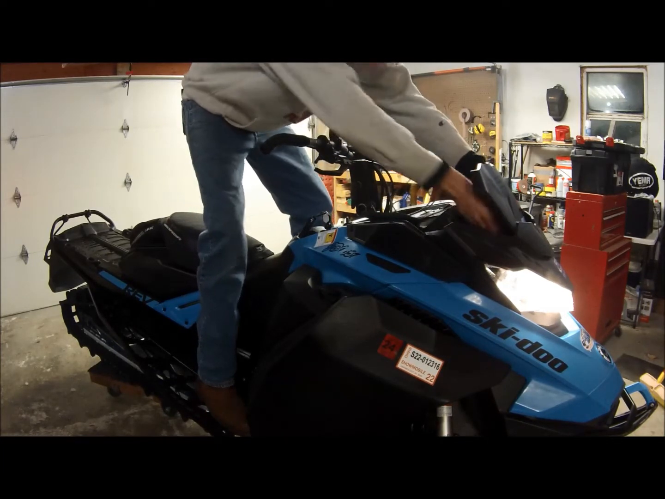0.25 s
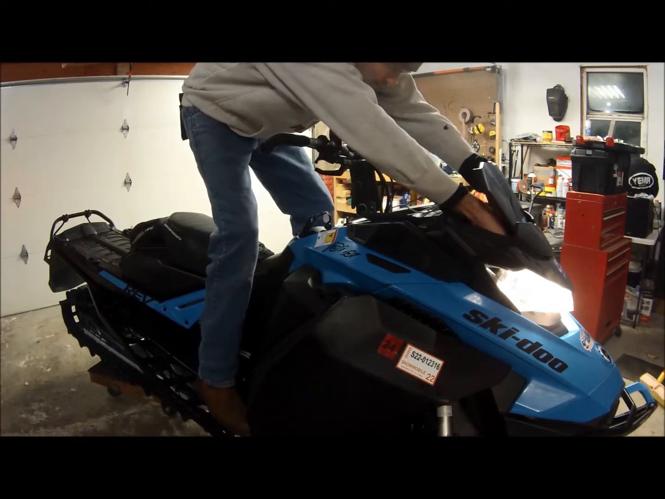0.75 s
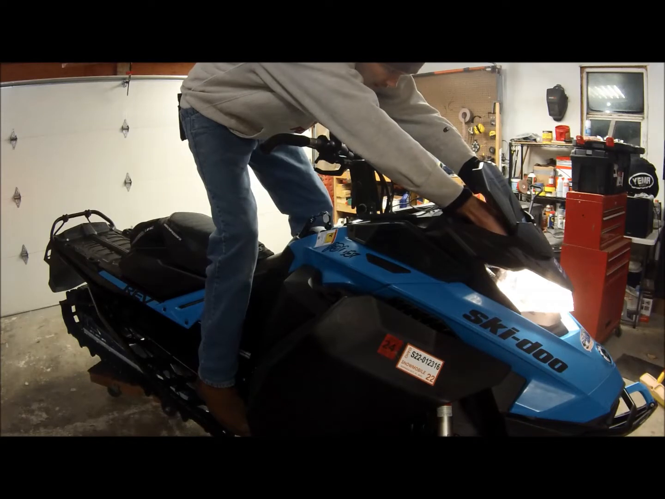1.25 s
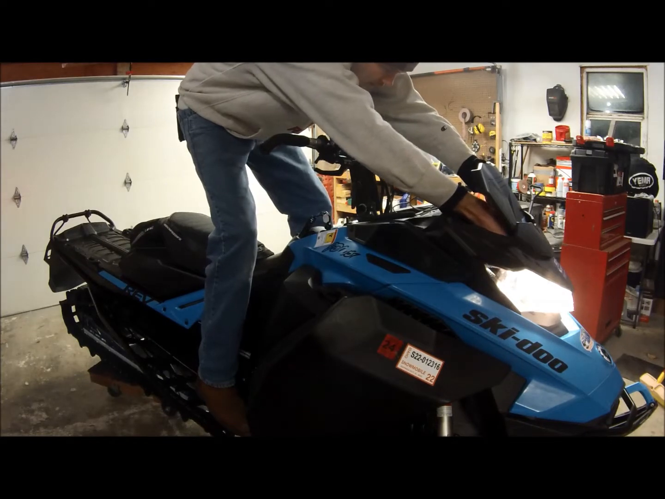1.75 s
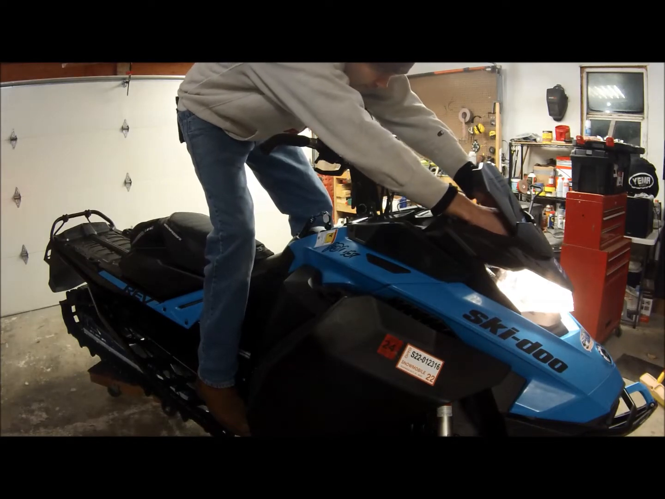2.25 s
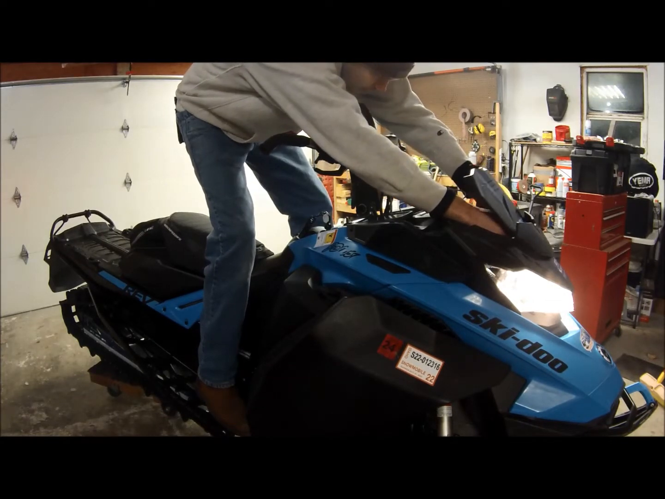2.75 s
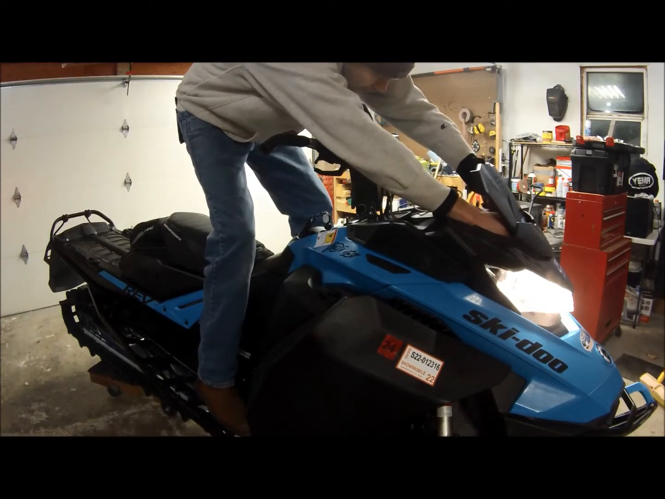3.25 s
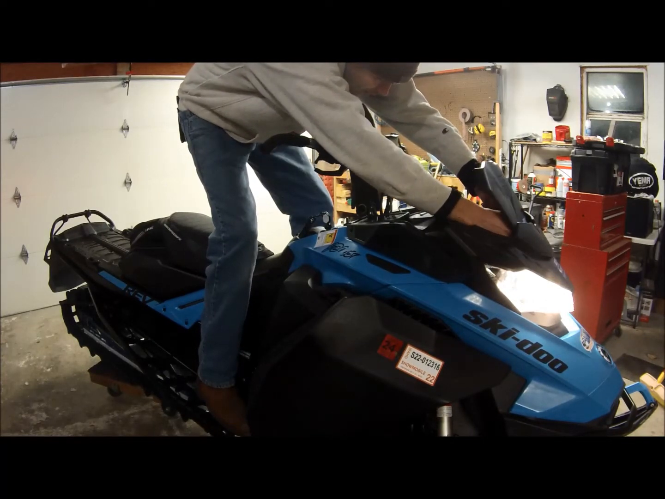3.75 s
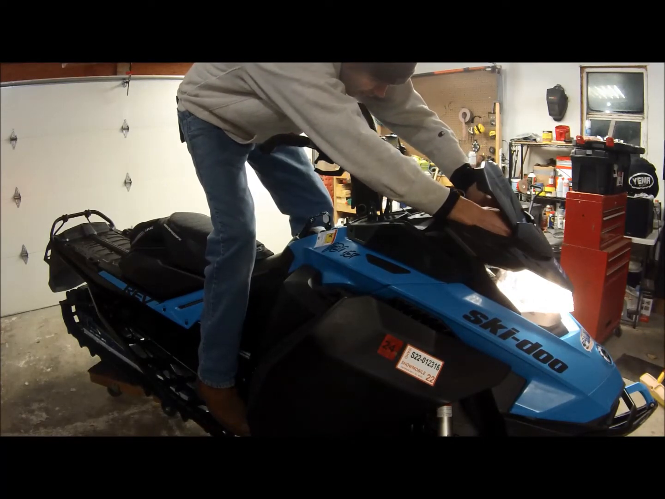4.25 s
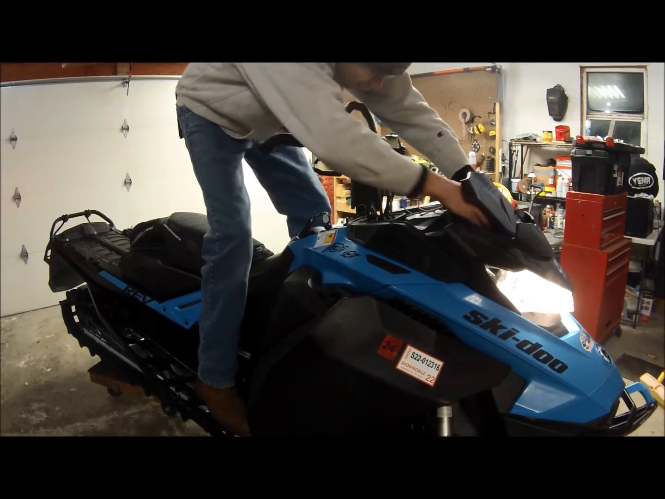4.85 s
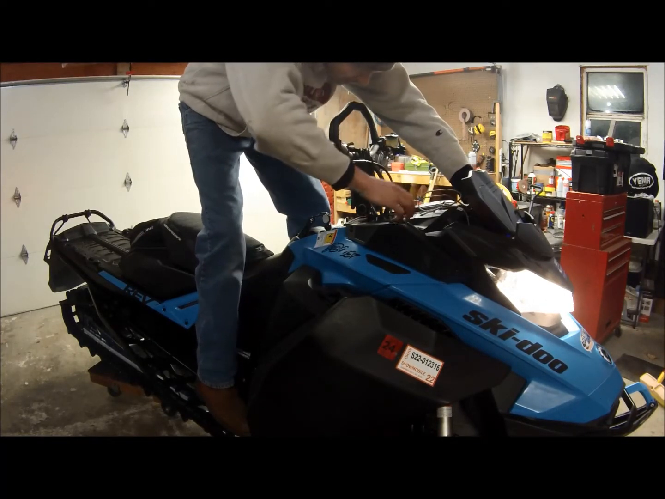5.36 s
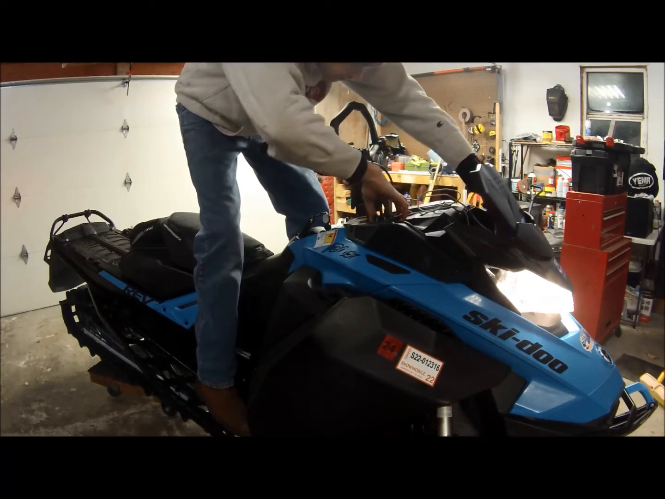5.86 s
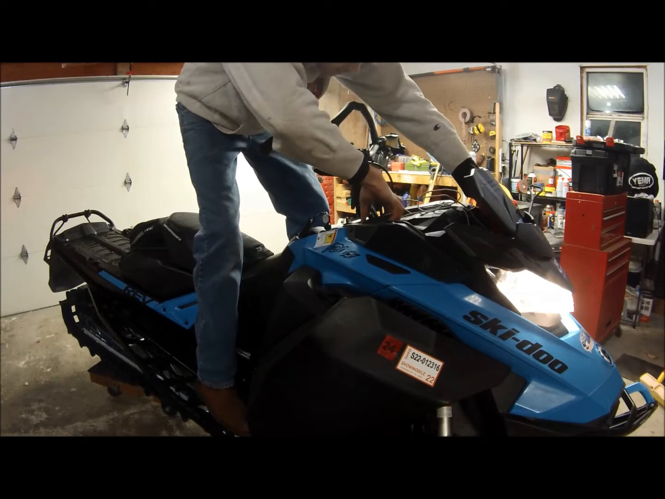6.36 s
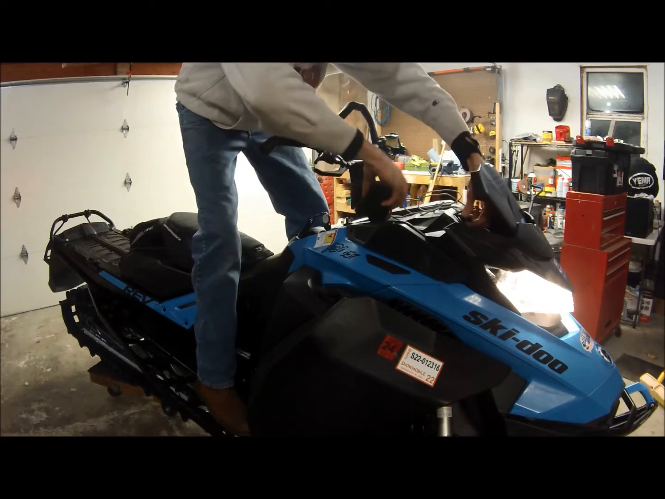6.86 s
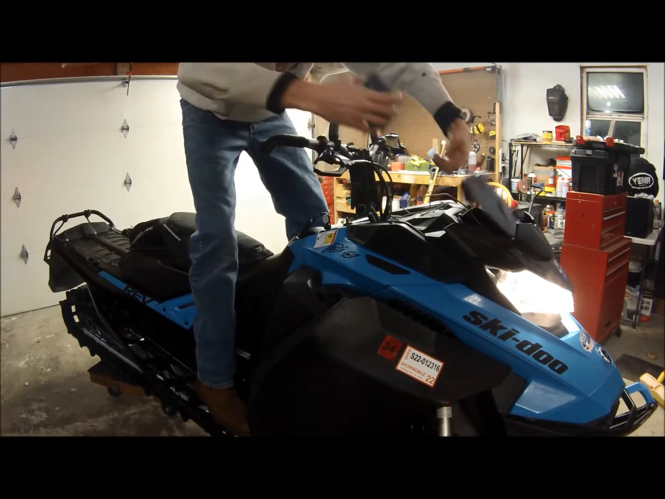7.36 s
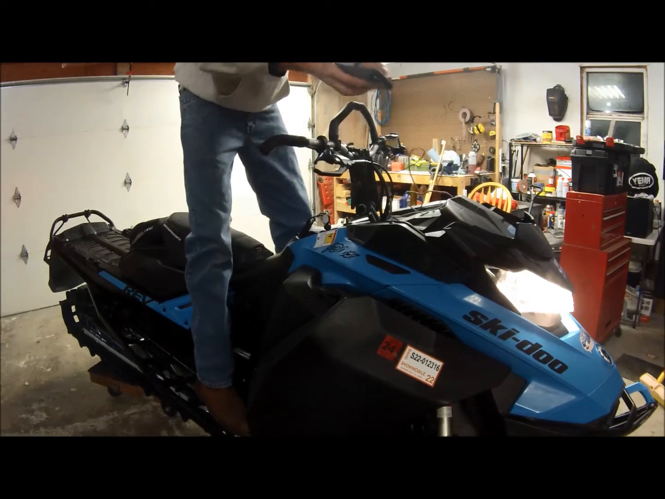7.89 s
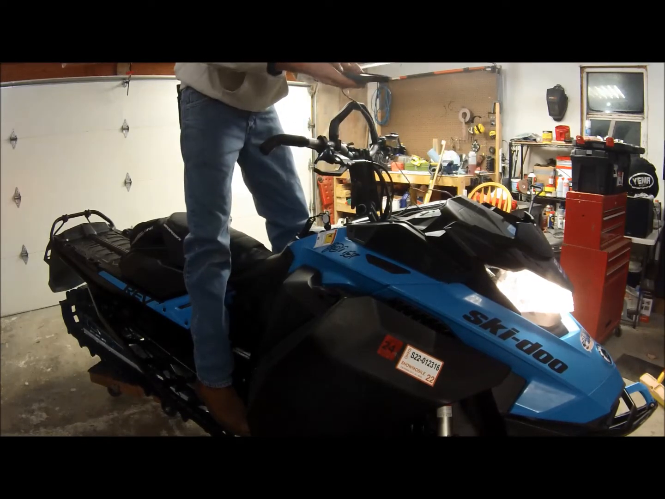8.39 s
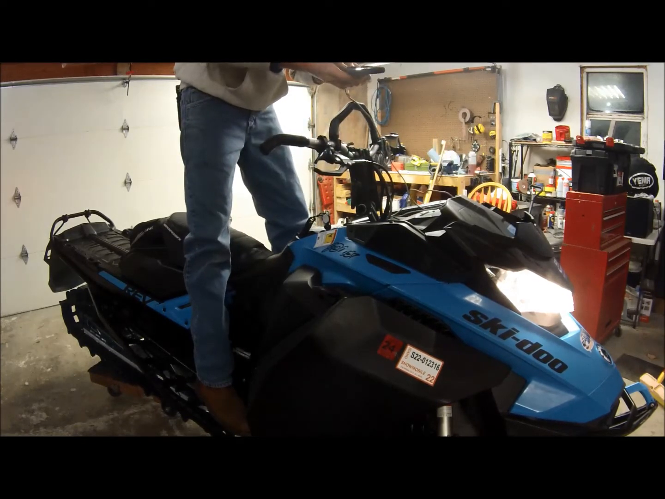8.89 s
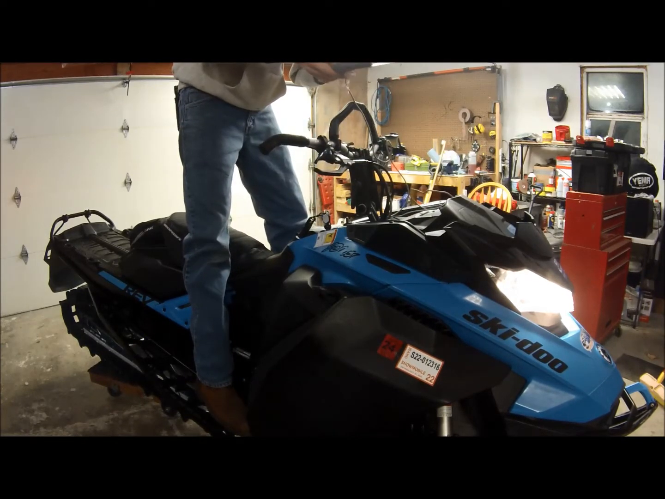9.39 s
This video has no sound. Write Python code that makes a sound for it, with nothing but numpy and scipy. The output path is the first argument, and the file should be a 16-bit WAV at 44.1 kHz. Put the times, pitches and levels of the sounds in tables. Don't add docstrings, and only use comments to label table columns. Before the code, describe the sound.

Continuous low engine idle, buzzing and slightly lumpy, never revving up or stopping. Over the boom lie a throaty exhaust burble and dry rattling of pistons and clutch, softened by diffuse garage echo. Tiny ticks are almost buried in it; one clear, bright plastic snap with quick little bounces stands out late. The small microphone a few metres away gives muffled treble.

```python
import sys
import numpy as np
from scipy import signal
from scipy.fft import rfft, irfft
from scipy.io import wavfile
from scipy.ndimage import uniform_filter1d

SR = 44100
rng = np.random.default_rng(int(sys.argv[2]) if len(sys.argv) > 2 else 0)


def to_wav(s):
    ch = np.atleast_2d(s).T
    pcm = np.round(np.clip(ch, -1, 1) * 32767)
    wavfile.write(sys.argv[1], SR, pcm.astype(np.int16))


def magnitude_from_level(level_db):
    exponent = np.asarray(level_db, float) / 20
    return 10 ** exponent


N = 424683


def level(x, db):
    return x * magnitude_from_level(db) / np.sqrt(np.mean(x ** 2))


def curves(table):
    s, *columns = np.transpose(table)
    return [np.interp(np.arange(N) / SR, s, c) for c in columns]


def spells(events, half_s, late_s=0):
    t = np.arange(0, N, 64) / SR
    s, *heights = np.transpose(events)
    bells = np.exp(-0.5 * ((t - s[:, None] - late_s) / half_s) ** 2)
    return [np.interp(np.arange(N) / SR, t, h @ bells) for h in heights]


def walk(rate):
    k = int(SR / rate)
    held = np.repeat(rng.standard_normal(N // k + 1), k)
    return 1.3 * uniform_filter1d(uniform_filter1d(held, k), k)[:N]


def ring(x, modes, sign=-1):
    out = 0
    for k, (hz, width, db) in enumerate(modes):
        b, a = signal.iirpeak(hz, hz / (1.74 * width), fs=SR)
        mode = signal.lfilter(b, a, signal.lfilter(b, a, x))
        out = out + sign ** k * magnitude_from_level(db) * mode
    return out


def colour(x, spectrum):
    hz, db = np.transpose(spectrum)
    f = np.maximum(np.arange(N // 2 + 1) * SR / N, 1)
    return irfft(rfft(x) * magnitude_from_level(np.interp(np.log(f), np.log(hz), db)), N)


def even(x, floor):
    power = uniform_filter1d(x ** 2, size=5000)
    return level(x / np.sqrt(power + floor * np.mean(x ** 2)), 0)


def pulses(turns, size, late_s):
    at = np.flatnonzero(np.diff(np.floor(turns)))
    delay = (late_s[:len(at)] * SR).astype(int)
    out = np.zeros(N)
    out[np.clip(at + delay, 0, N - 1)] = size[:len(at)]
    return out


def governor():
    # time in seconds, firing rate in Hz, lumpiness of the firings in dB.
    idle = [(0.0, 51.76, 1), (0.44, 47.2, 1), (0.65, 50.85, -3), (0.8, 48.36, -4.5), (1.46, 50.82, 4),
            (1.6, 47.68, 0), (2.42, 50.77, -1.5), (3.04, 48.4, 0.5), (3.55, 50.17, -5), (3.71, 46.2, -1.5),
            (4.45, 50.4, 0.9), (5.08, 48.74, -1), (5.93, 51.68, 5), (6.55, 49.2, 3.5), (7.4, 48.1, -0.5),
            (8.39, 50.6, 1.5), (8.62, 48.3, -3), (9.23, 50.5, -0.4)]
    # time in seconds, loss of beat in dB, speed lost afterwards in Hz.
    stumbles = [(0.13, 2.7, -0.17), (0.36, 1, -0.25), (0.65, 2, 0.8), (1.3, 1, 0.47), (1.6, 2.0, -1.04),
                (2.43, 4, -0.32), (2.62, 0, 0.88), (2.9, 4.3, 2.5), (3.22, 3, 0.26), (3.92, 2, 0.45),
                (4.24, 5, -0.0), (4.57, 1, -0.13), (4.87, 3, -0.48), (5.07, 1, 1.41), (5.43, 4.5, 1.0),
                (5.71, 5, 2), (6.06, 5.0, 1.3), (6.37, 2.5, 0.1), (6.82, 5.4, 0.54), (7.16, 3.9, 1.02),
                (7.62, 2.3, 0.36), (8.03, 1.8, 0), (8.37, 1, -0.0), (8.56, 2.2, 0.17), (9.26, 4, -0.4),
                (9.4, 4, 1.1)]
    # time
    # in seconds, flare in dB.
    catches = [(0.79, 2.5), (1.15, 1.2), (1.54, 2.5), (1.92, 0.5), (2.09, 1.8), (2.33, 1.6), (2.5, 1),
               (2.7, 1.8), (2.92, 3.8), (3.27, 1.5), (3.63, 2.5), (4.14, 0.5), (4.45, 1.5), (4.74, 2),
               (5.08, 1), (5.36, 0.5), (5.76, 2), (6.53, 2.5), (6.87, 4), (7.2, 0.8), (7.5, 4), (7.91, 0.8),
               (8.29, 1.4), (8.6, 0.5), (8.92, 1), (9.11, 1.4)]
    # time in seconds, thump lost in dB.
    even_runs = [(0.29, 3), (0.76, 2), (1.42, 6), (1.86, 6), (3.1, 6), (3.4, 2), (3.6, 9.7), (3.98, 7),
                 (4.95, 4.1), (5.55, 3), (6.9, 6), (7.8, 5.5), (8.69, 7), (9.19, 10)]
    # time in seconds, muffler in dB, pipe in dB.
    puffs = [(0.15, 3.7, 3), (0.37, 0, 3.0), (1.16, 3, 2.1), (1.38, 1, 3), (2.35, 1, 2), (2.67, 3, 0.5),
             (2.96, 2, 2.7), (3.25, 3, 0.5), (3.64, 2.5, 2), (4.42, 0, 3), (4.65, 1, 1.5), (5.34, -2, 2.5),
             (5.68, -2, 2.5), (5.95, 1, 1.5), (6.09, 1, 1), (6.33, 1, 2.5), (6.9, 1, 3), (7.49, 6, 1.8),
             (8.13, 2.8, -1.5), (8.41, 2.5, 0.8), (8.8, 2.5, 0), (8.96, 1, 0.5), (9.22, 3, 4.5),
             (9.4, 1, 2.0)]
    slow_hz, lumpy = curves(idle)
    fast = slow_hz - 49.3
    stumble = spells(stumbles, half_s=0.021)[0]
    sag_hz = spells(stumbles, half_s=0.07, late_s=0.07)[1]
    catch = spells(catches, half_s=0.029)[0]
    calm = spells(even_runs, half_s=0.051)[0]
    muffler, pipe = spells(puffs, half_s=0.033)

    boom_db = -21.5 - 0.2 * fast - 1.27 * stumble - 0.15 * lumpy
    thump_db = -33.5 + 0.52 * lumpy + stumble - 1.6 * calm
    warming_db = 0.28 * np.arange(N) / SR
    muffler_db = -35.5 + 0.75 * fast + 1.33 * muffler + warming_db
    pipe_db = -31.5 + 0.2 * fast + 1.34 * pipe
    clatter_db = -35 + 0.82 * catch
    return slow_hz - sag_hz, boom_db, (thump_db, muffler_db, pipe_db), clatter_db


def boom(turns, boom_db):
    # multiple of the firing rate, level under the fundamental in dB.
    harmonics = [(1 / 2, -38), (2.3, -40), (3, -12), (4, -30)]
    angle = 2 * np.pi * turns + 0.078 * walk(16)
    wave = magnitude_from_level(0.7 * walk(11)) * np.sin(angle)
    for k, db in harmonics:
        wave = wave + magnitude_from_level(db + 1.4 * walk(12)) * np.sin(k * angle + 0.088 * k * walk(12))
    return np.sqrt(2) * magnitude_from_level(boom_db) * wave


def exhaust(turns, thump_db, muffler_db, pipe_db):
    # frequency in Hz, width in Hz, level in dB.
    thump_bands = [(65.2, 5, 2), (84.2, 6.3, 0.5), (119.2, 16, -2.5), (134.2, 10.4, -7.5), (173, 12.7, -7)]
    # frequency in Hz, width in Hz, level in dB.
    muffler_modes = [(170.3, 11.5, -3), (194.8, 9.2, -9.5), (253, 21.8, -1), (285.2, 19.8, -3),
                     (316.4, 15, -19.5)]
    # frequency in Hz, width in Hz, level in dB.
    pipe_modes = [(334.9, 16, -4), (363.3, 12.9, 3), (397.9, 12.8, -3.5), (430.6, 14, -9.5),
                  (461.6, 8.7, -10.5)]
    chance = rng.standard_normal((600, 3)).T
    third = 2 * np.pi / 3
    charge = np.cos(np.cumsum(third + 0.45 * chance[0])) + 0.18 * chance[1]
    thump = even(ring(pulses(turns, charge, 0 * charge), thump_bands), 0.24)

    settling_db = 0.6 * (np.arange(N) - N / 2) / SR
    uneven = magnitude_from_level(0.6 * (thump_db - np.mean(thump_db)) - settling_db)
    late_s = 0.00028 * chance[2]
    regular = pulses(turns, np.ones_like(charge), late_s)
    blow = regular + 0.31 * uneven * pulses(turns, charge, late_s)
    hiss = level(rng.standard_normal(N), -7)
    gas = level(blow, 0) + uneven * hiss
    muffler = even(ring(gas, muffler_modes), 0.34)
    pipe = even(ring(np.roll(gas, shift=SR // 120), pipe_modes), 0.32)
    return magnitude_from_level(thump_db) * thump + magnitude_from_level(muffler_db - 0.16) * muffler - magnitude_from_level(pipe_db + 0.07) * pipe


def clatter(turns, db):
    # frequency in Hz, width in Hz, level in dB.
    hood = [(681, 9, -7.5), (1102, 69, -18.5), (1290, 32, -17), (1473, 15, -11), (1615, 15, -15),
            (1716, 14.3, -3), (1760, 40, -16), (1834, 50, -4), (2050, 49, -19)]
    # frequency in Hz, level in dB per Hz.
    knock_spectrum = [(300, -49), (480, 1), (560, 1), (700, 0), (850, -1), (960, 2.5), (1180, 0.5),
                      (1400, -7), (1760, -2.5), (2010, -6.5), (2600, -9), (3700, -10), (15500, -13)]
    knocks = (rng.random(N) < 1500 / SR) * rng.standard_normal(N)
    beat = 1 + 0.15 * np.cos(2 * np.pi * turns - 1.2) + 0.087 * np.cos(4 * np.pi * turns)
    smear = rng.standard_normal(N)
    drive = (beat * level(knocks, -6.5) + smear) * magnitude_from_level(0.88 * walk(20))
    shaped = colour(drive + magnitude_from_level(9.5) * ring(drive, hood, sign=0.83), knock_spectrum)
    return level(shaped, 2.71) * magnitude_from_level(db)


def rumble():
    # frequency in Hz, level in dB per Hz.
    rumble_spectrum = [(12, -34), (24, -6), (34, -20), (60, -10.5), (100, -11), (215, -13.5), (330, -11),
                       (520, -20.5), (700, -44)]
    return level(colour(rng.standard_normal(N), rumble_spectrum), -34.5)


def snaps():
    # time in seconds, peak level in dB.
    snap_events = [
        (1.1812, -48),
        (3.4224, -52),
        (7.4697, -26.5),
        (7.492, -44),
        (7.507, -46),
        (9.2106, -59),
    ]
    # frequency in Hz, width in Hz, level in dB.
    snap_modes = [(2010, 1900, 1), (3380, 1130, 9), (6150, 1100, 14.6), (8540, 2200, 16), (11200, 2100, 17),
                  (13900, 2200, 27)]
    out = np.zeros(N)
    t = np.arange(int(0.03 * SR)) / SR
    crack = (1 - np.exp(-t / 0.00048)) * np.exp(-t / 0.0023)
    rebound = 0.15 * (t > 0.006) * np.exp(-np.abs(t - 0.006) / 0.0015)
    for s, db in snap_events:
        signs = np.sign(rng.standard_normal(len(t)))
        out[int(s * SR):int(s * SR) + len(t)] += magnitude_from_level(db) * (crack + rebound) * signs
    return magnitude_from_level(10.0) * ring(out, snap_modes, sign=0.97)


def walls(x):
    # frequency in Hz a little under the band's upper edge, time to decay by 60 dB in seconds, level
    # in dB.
    room_bands = [(570, 0.53, 3.5), (1080, 0.45, -1), (2100, 0.57, -2), (3660, 0.47, 0), (5800, 0.41, -3.5),
                  (9100, .32, 4), (13500, 0.18, -11)]
    t = np.arange(SR // 2) / SR
    tail = 0
    for hz, t60, db in room_bands:
        edges = [hz / 1.83, min(hz * 1.17, 20000)]
        sos = signal.butter(2, edges, "band", fs=SR, output="sos")
        band = signal.sosfilt(sos, rng.standard_normal(len(t)))
        tail = tail + band * magnitude_from_level(db - 60 * t / t60)
    tail = tail * (1 - np.exp(-t / 0.0014))
    return signal.fftconvolve(x, tail / np.sqrt(np.sum(tail ** 2)))[:N]


def scene():
    hz, boom_db, exhaust_db, clatter_db = governor()
    turns = np.cumsum(hz) / SR
    rattle = clatter(turns, clatter_db)
    clips = snaps()
    engine = boom(turns, boom_db) + exhaust(turns, *exhaust_db) + rattle
    echo = walls(magnitude_from_level(-16) * rattle + magnitude_from_level(-2.5) * clips)
    return (engine + rumble() + clips + echo)[None]


def band_limit(x):
    return signal.sosfilt(signal.butter(12, 15710, fs=SR, output="sos"), x)


def record(dry):
    # frequency in Hz, response in dB.
    microphone = [(3650, 0.5), (4050, -6.5), (4800, -14), (6500, -9), (7300, -20.5), (8500, -20.5),
                  (9100, -24.5), (10900, -23.5), (11600, -31.5), (13300, -30), (14900, -32)]
    low_pass = signal.ellip(10, 0.3, 45, 14970, fs=SR, output="sos")
    heard = signal.sosfilt(low_pass, colour(dry[0], microphone))
    return band_limit(heard[None])


dry = scene()
out = record(dry)
to_wav(out)
```